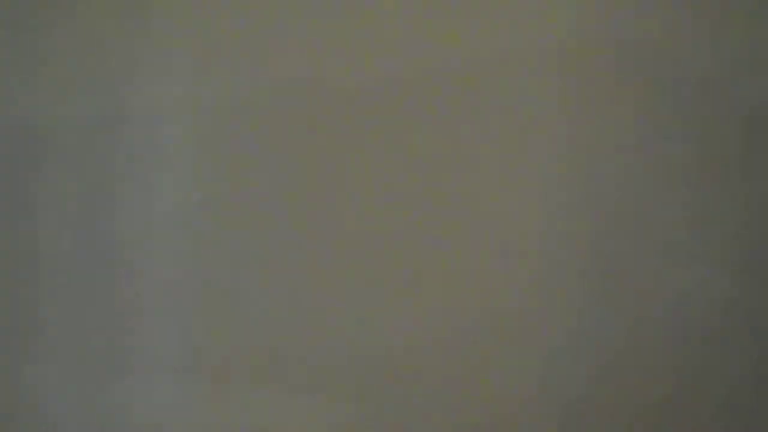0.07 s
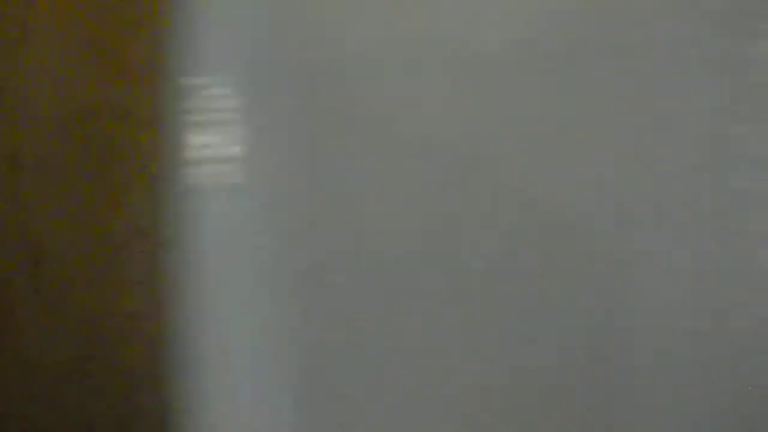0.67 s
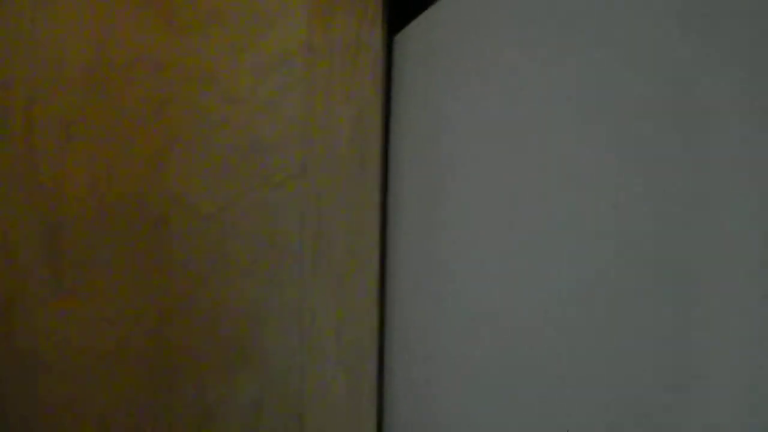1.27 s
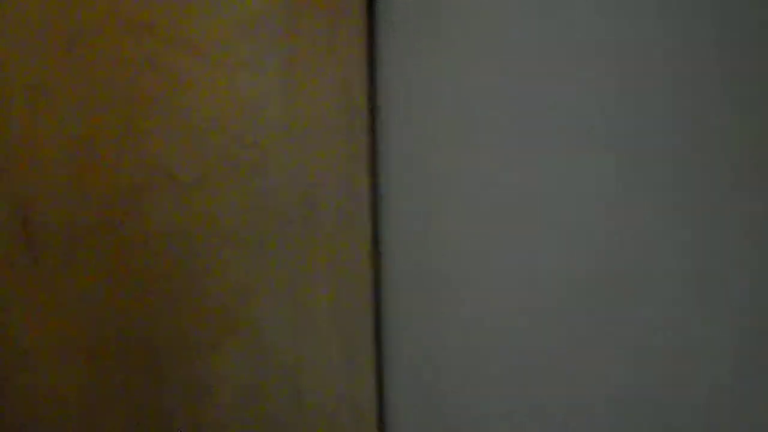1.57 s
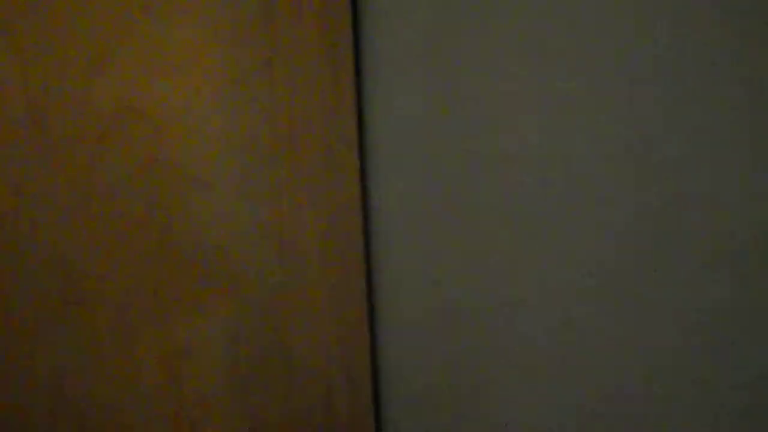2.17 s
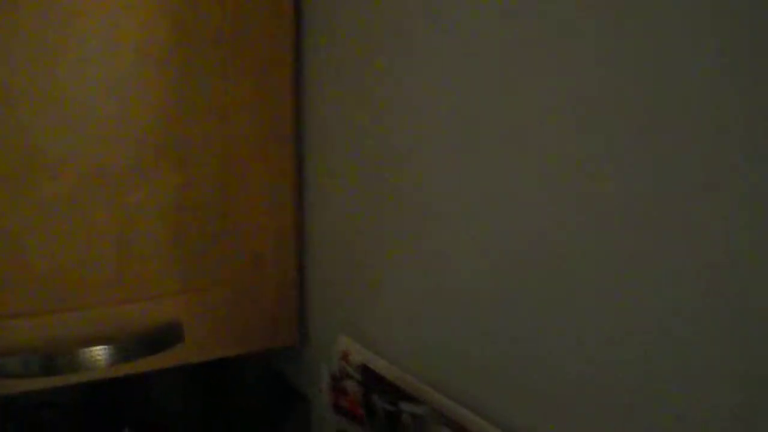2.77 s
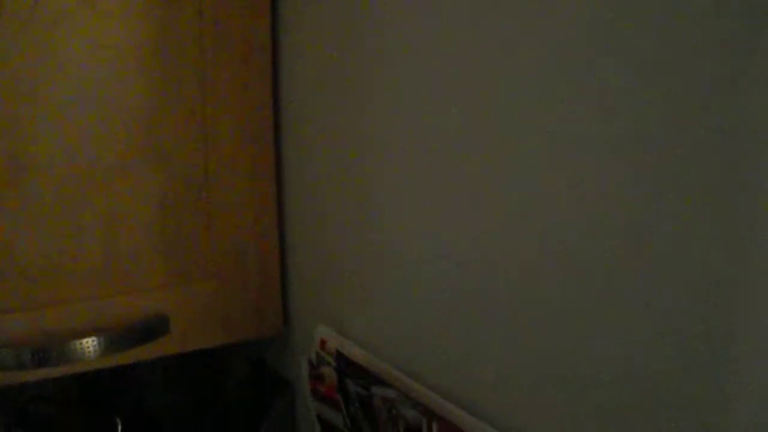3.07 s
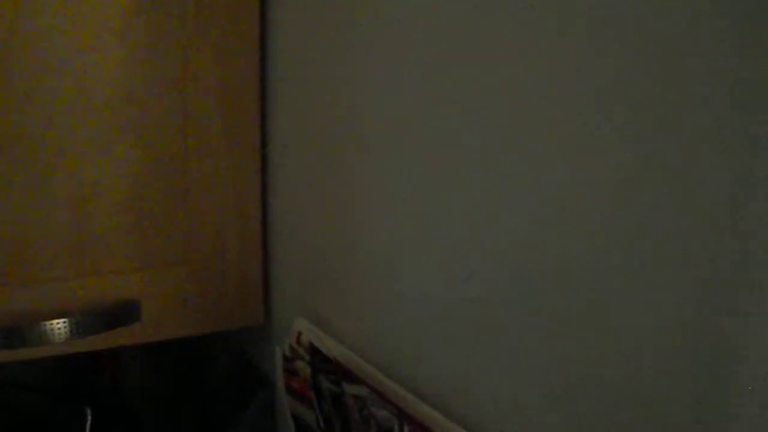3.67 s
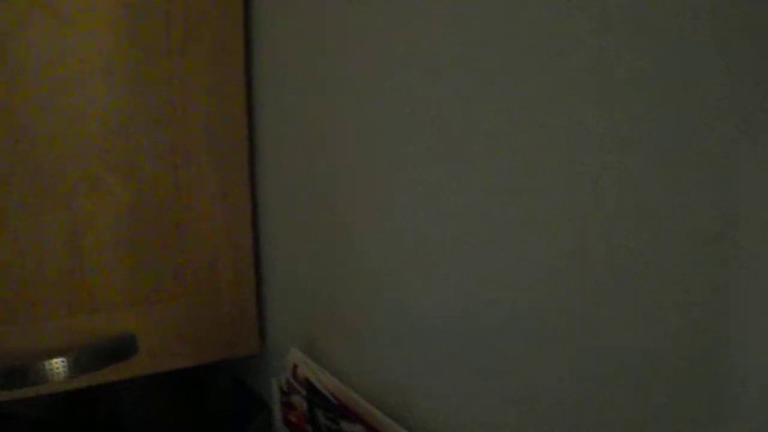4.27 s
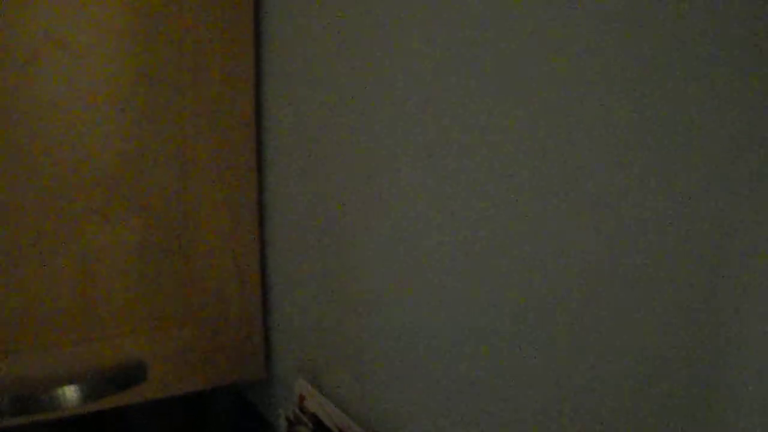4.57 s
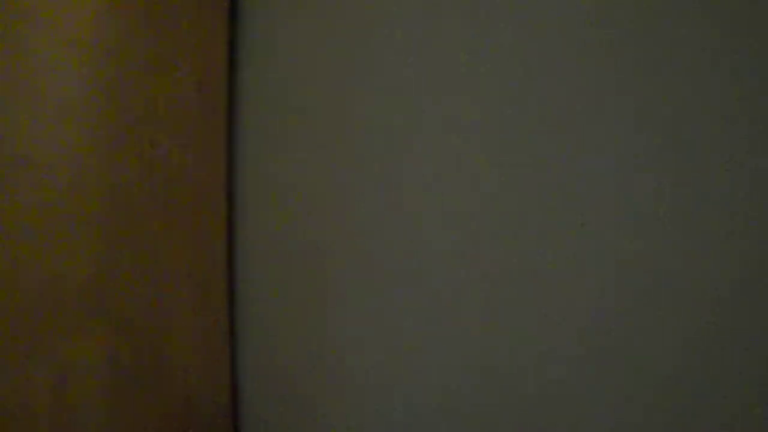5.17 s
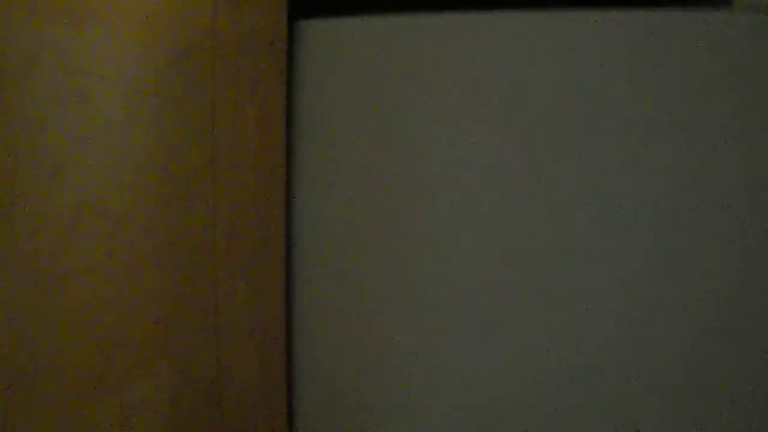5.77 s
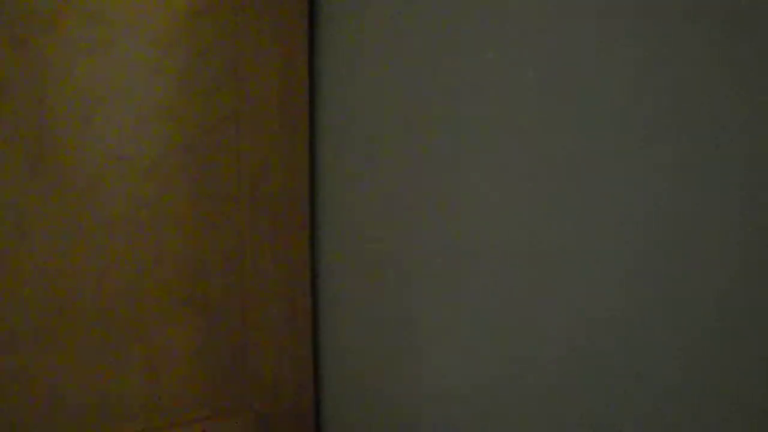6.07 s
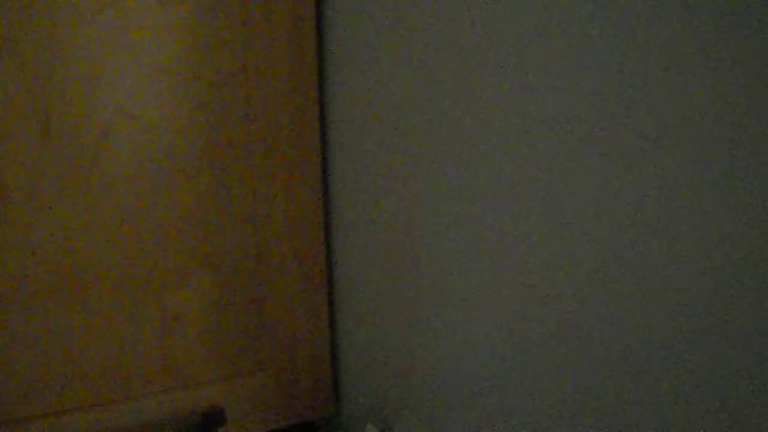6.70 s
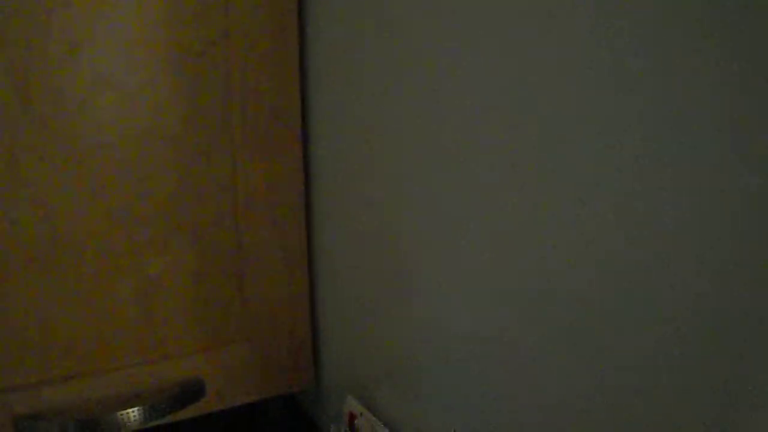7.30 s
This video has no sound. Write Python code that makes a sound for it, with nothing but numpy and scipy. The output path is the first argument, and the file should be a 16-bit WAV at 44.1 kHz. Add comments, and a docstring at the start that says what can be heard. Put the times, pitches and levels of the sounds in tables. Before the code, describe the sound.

A refrigerator freezer knocks steadily over hum and hiss; its door thuds shut early and the knocking turns hollow and muffled.

```python
"""Small kitchen: a freezer knocks about five times a second over compressor hum, fan, air and hiss.
Each knock is a soft blow into broad resonances. The first come through the open door; then the door
thuds shut and the gain control ducks for about a second. After that the knocks sound hollow and
muffled from inside the cabinet, while the listener drifts about beside it with faint taps and rustles."""
import sys
import numpy as np
from scipy import signal
from scipy.fft import rfft, irfft
from scipy.io import wavfile

SR = 44100
rng = np.random.default_rng(int(sys.argv[2]) if len(sys.argv) > 2 else 0)


def generate_wav(signal):
    """Clip the signal to [-1, 1] and save it as 16-bit WAV at the path in sys.argv[1]."""
    frames = np.transpose(np.atleast_2d(signal))
    scaled = np.clip(frames, -1, 1) * 32767
    pcm = np.round(scaled).astype(np.int16)
    wavfile.write(sys.argv[1], SR, pcm)


N = 323694
TIME = np.arange(N) / SR
HIT_TIME = TIME[:SR // 2]

# freezer strength at the listener: t/s, level/dB
NEARNESS = [(.4, -7.5), (1.05, -4), (1.7, 1.36), (2.35, 3.5), (2.84, -0.15), (3.6, 1.4), (4.11, 2.5),
            (4.85, 0.46), (5.35, -3.3), (6.5, -1.5), (7.3, 0)]
# knock reverberation spectrum: f/Hz, density/dB
REVERB_SPECTRUM = [(100, -21), (250, -14), (340, -19), (480, -4.5), (560, -24), (680, -7.5), (890, -13.5),
                   (1010, -0.5), (1150, -4), (1300, -14.5), (1450, -22.5), (1720, -35), (9000, -63)]
# hard edge of a blow: f/Hz, density/dB
EDGE_SPECTRUM = [(1700, 1), (2400, -2), (3050, 2), (3850, -1.5), (4600, -5), (7000, -17.5), (10000, -24),
                 (12000, -36)]
# door meets frame: t/s, level/dB
DOOR_HITS = [(0.422, 3), (0.4249, 15.5)]
SHUT_S = DOOR_HITS[0][0]


def knock_pulse(cut_hz, leak_db):
    """Soft blow into broad resonances; a trace of treble leaks past the cut. Peak 1."""
    # knocking part: f/Hz, bandwidth/Hz, level/dB
    modes = [(110, 630, -36), (270, 70, -26.5), (482, 88, -16), (1030, 174, -1.5), (1567, 57, -14)]
    blow = signal.unit_impulse(len(HIT_TIME)) + 1e-18
    body = 0
    for k, (hz, width_hz, level_db) in enumerate(modes):
        r = np.exp(-np.pi * width_hz / SR)
        ring = signal.lfilter([1, 0, -1], [1, -2 * r * np.cos(2 * np.pi * hz / SR), r * r], blow)
        body += (-1) ** k * from_db(level_db) * (1 - r * r) / 2 * ring
    dull = signal.sosfilt(signal.butter(10, cut_hz, fs=SR, output="sos"), body)
    pulse = dull + from_db(leak_db) * body
    return pulse / np.abs(pulse).max()


def muffled_knocks():
    """Equal blows behind the shut door; level and reflections change as the listener moves."""
    # onsets: t/s
    knock_times = [0.3543, 0.5584, 0.7644, 0.9735, 1.1776, 1.3915, 1.6034, 1.8149, 2.0208, 2.2263, 2.427,
                   2.6343, 2.84, 3.0473, 3.255, 3.4695, 3.678, 3.8908, 4.0982, 4.3, 4.503, 4.7107, 4.9128,
                   5.1216, 5.3316, 5.5432, 5.7544, 5.9682, 6.1722, 6.3757, 6.5791, 6.7849, 6.989, 7.2]
    # bounces in the compartment: delay/ms, signed gain
    compartment = [(1.499, -0.034), (2.921, 0.33), (4.92, 0.23), (6.328, -0.32)]
    # door panel modes: f/Hz, level/dB, t60/s
    panel_modes = [(511, -27, 0.03), (650, -24, 0.092), (1020, -30, 0.74), (1160, -34.5, 0.0092)]
    # cupboard and wall reflections at spots 0 (by the door), 1, 2: delay/ms, signed gain
    paths_0 = [(9.3, 0.36), (11.2, 0.056), (14.5, -0.38), (27.0, 0.12), (37.5, 0.12)]
    paths_1 = [(9.95, 0.28), (13.38, -0.069), (16.76, 0.21), (18.66, 0.062), (36.96, -0.076), (77.0, 0.042)]
    paths_2 = [(9.18, 0.18), (17.39, 0.16), (21.0, 0.04), (34.92, -0.064)]
    # listener's route: t/s, spot, reverberation/dB
    route = [(0.3, 0, 8.5), (1.2, -0.34, 4), (1.8, 1.9, -3), (2.2, 1.6, -4), (2.8, 1.64, -0.5),
             (3.6, 0.83, -2), (4.5, 1.5, -3), (5.3, 2, 3.5), (7.3, 1.74, -0.5)]
    pulse = knock_pulse(cut_hz=1410, leak_db=-38)
    panel = echoes(ringing(panel_modes), [(0.2, 0.64)])  # just ahead of the compartment sound
    direct = echoes(pulse, compartment) + panel
    edge = from_db(-41.5) * tail(EDGE_SPECTRUM, t60_s=0.087, build_s=0.0026)
    at_spots = [echoes(pulse, paths) for paths in (paths_0, paths_1, paths_2)]
    rooms = [tail(REVERB_SPECTRUM, t60_s=0.4, build_s=0.0014) for _ in range(9)]
    out = np.zeros(N)
    for t_s in knock_times:
        near_db, = curves(NEARNESS, t_s)
        spot, wet_db = curves(route, t_s)
        spot = np.clip(spot, 0, 2)
        walls = sum(max(0, 1 - abs(spot - k)) * heard for k, heard in enumerate(at_spots))
        # crossfade to a new diffuse pattern each second
        second, turn_rad = int(t_s), t_s % 1 * np.pi / 2
        room = np.cos(turn_rad) * rooms[second] + np.sin(turn_rad) * rooms[second + 1]
        diffuse = from_db(0.2 * wet_db) * edge + from_db(wet_db - 22.5) * room
        knock = from_db(3.5) * (direct + walls) + diffuse
        add(out, from_db(near_db) * knock, t_s)
    return out


def open_knocks():
    """Blows through the open door: short, with a bright edge."""
    # onsets: t/s
    knock_times = [-0.07, 0.1259]
    # paths through the opening: delay/ms, signed gain
    paths = [(0.1, 0.66), (4.95, 0.57), (27.5, 0.3), (36.0, 0.16)]
    direct = from_db(2.5) * echoes(knock_pulse(cut_hz=1530, leak_db=-23), paths)
    room = from_db(-17) * tail(REVERB_SPECTRUM, t60_s=0.34, build_s=0.02)
    edge = from_db(-11.5) * tail(EDGE_SPECTRUM, t60_s=0.015, build_s=0.0008)
    edge += from_db(-29) * tail(EDGE_SPECTRUM, t60_s=0.17, build_s=0.0018)
    out = np.zeros(N)
    for t_s in knock_times:
        add(out, direct + room, t_s)
        add(out, edge, t_s + 0.0015)
    return out


def door():
    """The swinging door ticks and pushes air; the seal slaps twice, the cabinet booms, the room rings."""
    # door and cabinet: f/Hz, level/dB, t60/s
    modes = [(46, 2, 0.2), (129, -6, 0.16), (276, -14, 0.26), (352, -9, 0.23), (406, -6, 0.23),
             (474, -6.5, 0.29), (710, -20, .05), (880, 4, 0.029), (1070, -14, .035)]
    # seal slap and swing tick: f/Hz, density/dB
    slap_spectrum = [(60, 7), (400, -5.5), (950, 7.5), (1700, -17.5), (3000, -13), (5000, -18),
                     (7000, -14.5), (10000, -30), (12000, -58)]
    tick_spectrum = [(1700, -12), (3100, 1), (4200, -11), (6000, -12), (9700, -10), (11000, -37)]
    out = from_db(-14) * np.exp(-np.abs(TIME - SHUT_S) / 0.007) * (TIME < SHUT_S)  # air push
    add(out, from_db(-29) * tail(tick_spectrum, t60_s=0.045, build_s=0.0011), t_s=0.356)
    boom = from_db(-17) * ringing(modes)
    for t_s, level_db in DOOR_HITS:
        slap = from_db(-5.5) * tail(slap_spectrum, t60_s=0.022, build_s=0.00022)
        room = from_db(-21) * tail(slap_spectrum, t60_s=0.34, build_s=0.0023)
        add(out, from_db(level_db) * (boom + slap + room), t_s)
    return out


def compressor(near_db):
    """Steady hum of shaft and mains tones."""
    # tones: f/Hz, level/dB
    lines = [(59.3, -1.5), (62.3, -16), (120, -14), (240, -14)]
    return from_db(-39 + 0.15 * near_db) * tones(lines, waver_db=0.95, waver_rad=0.19)


def fan(near_db, swell_s=0.31):
    """Four-bladed fan; its hum is weak with the door open and builds once it is shut."""
    # shaft and blade tones: f/Hz, level/dB
    lines = [(32.4, -14.5), (129.6, -1), (259.2, -15.5), (388.8, -15), (777.6, -19)]
    door_db = -18 * np.exp(-np.maximum(TIME - SHUT_S, 0) / swell_s)
    return from_db(-39.5 + door_db + 0.45 * near_db) * tones(lines, waver_db=1.0, waver_rad=0.28)


def air(near_db):
    """Rush of moving air; more escapes while the door is open."""
    # rush: f/Hz, density/dB
    spectrum = [(20, -19), (55, -5), (100, -6), (170, -4.5), (245, 0), (345, -2.5), (480, -1.5), (560, -4),
                (680, -5.5), (850, -3), (1030, -5.5), (1300, -9.5), (1700, -21.5), (4000, -57)]
    door_db = 4.5 * (TIME < SHUT_S)
    return from_db(-41.5 + door_db + 0.091 * near_db) * noise(spectrum, N)


def hiss():
    """Even broadband hiss."""
    # hiss: f/Hz, density/dB
    spectrum = [(200, 1.5), (1700, 3.5), (3200, 1.5), (5000, -1), (6400, -1.5), (6900, -2), (7500, -2.5),
                (10000, -3.5), (10500, -8.5), (11000, -21.5), (11600, -21), (12300, -31)]
    return from_db(-44) * noise(spectrum, N)


def handling():
    """Light handling taps; clothing rustles as the listener moves."""
    # rustles: centre/s, half length/s, level/dB
    rustles = [(.09, 0.072, -53), (3.17, 0.17, -47.5), (3.5, .16, -54), (6.55, .4, -57)]
    # taps: t/s, level/dB
    taps = [(1.997, -24.5), (2.403, -25)]
    # rustle and tap colours: f/Hz, density/dB
    rustle_spectrum = [(300, -7), (2000, -5), (3800, -3), (7000, -7), (11000, -25), (13000, -49)]
    tap_spectrum = [(100, -1), (600, 1), (1000, -5), (1700, -17), (3000, -21), (9000, -41)]
    swells = sum(from_db(db) * np.exp(-((TIME - t_s) / half_s) ** 2) for t_s, half_s, db in rustles)
    out = swells * noise(rustle_spectrum, N)
    for t_s, level_db in taps:
        add(out, from_db(level_db) * tail(tap_spectrum, t60_s=0.065, build_s=0.0009), t_s)
    return out


def from_db(db):
    """Decibels to gain."""
    return 10 ** (np.asarray(db) / 20)


def curves(rows, at_s):
    """Value columns of a time table, interpolated."""
    times_s, *columns = np.transpose(rows)
    return [np.interp(at_s, times_s, column) for column in columns]


def noise(spectrum, size):
    """Coloured noise, rms 1."""
    hz, level_db = np.transpose(spectrum)
    bins_hz = np.fft.rfftfreq(size, 1 / SR)
    gain = from_db(np.interp(np.log(bins_hz + 1), np.log(hz), level_db))
    x = irfft(rfft(rng.standard_normal(size)) * gain, size)
    return x / x.std()


def drift(rate_hz):
    """Slow random wander, spread about 1."""
    return np.interp(TIME * rate_hz, np.arange(1024), rng.standard_normal(1024))


def add(out, sound, t_s):
    """Mix a sound in from t_s, which may be negative."""
    start = round(t_s * SR)
    sound, start = sound[max(0, -start):], max(0, start)
    out[start:start + len(sound)] += sound[:len(out) - start]


def echoes(pulse, paths):
    """A pulse summed over delayed paths."""
    return sum(gain * np.interp(HIT_TIME - ms / 1000, HIT_TIME, pulse, left=0) for ms, gain in paths)


def decay(t60_s):
    """Exponential decay."""
    return from_db(-60 * HIT_TIME / t60_s)


def ringing(modes):
    """Struck modes as decaying sines."""
    return -sum(from_db(db) * decay(t60_s) * np.sin(2 * np.pi * hz * HIT_TIME) for hz, db, t60_s in modes)


def tail(spectrum, t60_s, build_s):
    """Noise burst: quick build, exponential decay."""
    return noise(spectrum, len(HIT_TIME)) * decay(t60_s) * (1 - np.exp(-HIT_TIME / build_s))


def tones(lines, waver_db, waver_rad):
    """Machine tones wavering in level and phase."""
    out = np.zeros(N)
    for hz, level_db in lines:
        amplitude = np.sqrt(2) * from_db(level_db + waver_db * drift(rate_hz=4.7))
        phase_rad = 2 * np.pi * (hz * TIME + rng.random()) + waver_rad * drift(rate_hz=1.98)
        out += amplitude * np.sin(phase_rad)
    return out


def low_pass(x, cut_hz):
    """Steep elliptic treble cut."""
    return signal.sosfilt(signal.ellip(10, 0.1, 80, cut_hz, fs=SR, output="sos"), x)


def gain_control(x, limit_db=-6, max_cut_db=15, attack_s=0.001, hold_s=0.75, release_s=0.48):
    """A peak over the limit pulls the gain down; it holds, then creeps back."""
    block = 32
    step_s = block / SR
    peaks_db = 20 * np.log10(np.maximum.reduceat(np.abs(x), np.arange(0, N, block)) + 1e-9)
    cuts_db, cut_db, held_s = [], 0, 0
    for over_db in np.clip(peaks_db - limit_db, 0, max_cut_db):
        held_s += step_s
        if over_db > cut_db:
            cut_db, held_s = over_db, 0
        elif held_s > hold_s:
            cut_db *= np.exp(-step_s / release_s)
        cuts_db.append(cut_db)
    pole = np.exp(-1 / (attack_s * SR))
    smooth_cut_db = signal.lfilter([1 - pole], [1, -pole], np.repeat(cuts_db, block)[:N])
    return x * from_db(-smooth_cut_db)


def scene():
    """All sources at one microphone."""
    near_db, = curves(NEARNESS, TIME)
    impacts = open_knocks() + door() + muffled_knocks()
    background = compressor(near_db) + fan(near_db) + air(near_db) + hiss()
    return (impacts + background + handling())[None]


def record(dry):
    """Band-limited input with gain control; peaks too quick for it clip, then the top is cut."""
    levelled = gain_control(low_pass(dry[0], cut_hz=11900))
    clipped = np.clip(levelled, -0.72, 0.72)
    return low_pass(clipped, cut_hz=15800)[None]


dry = scene()
out = record(dry)
generate_wav(out)
```